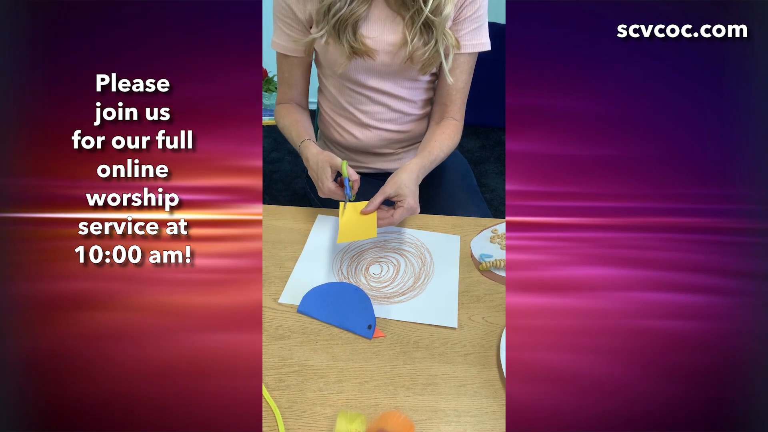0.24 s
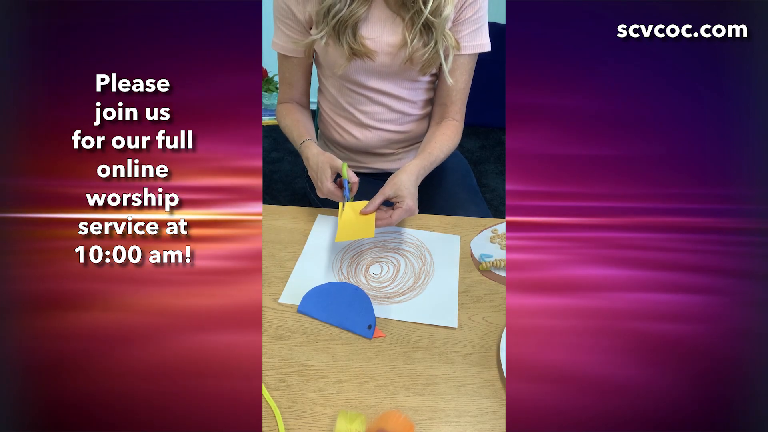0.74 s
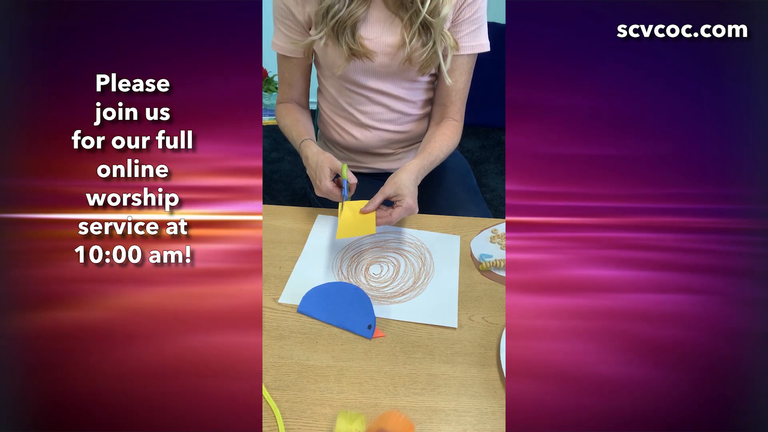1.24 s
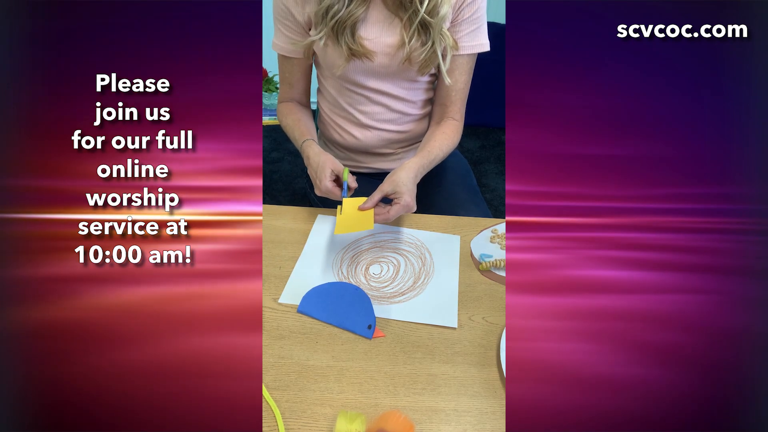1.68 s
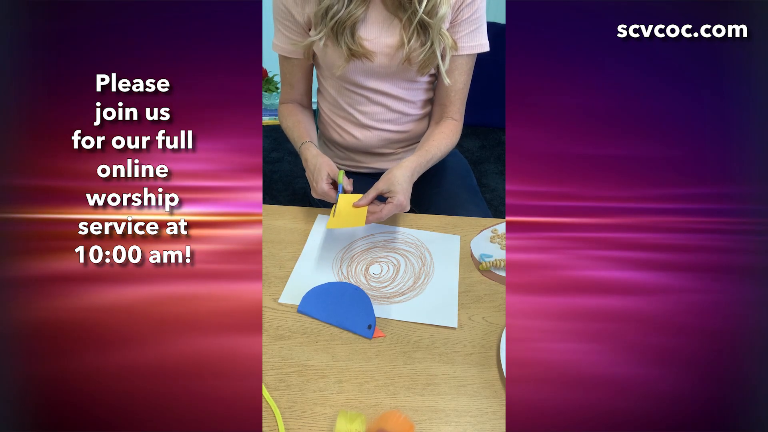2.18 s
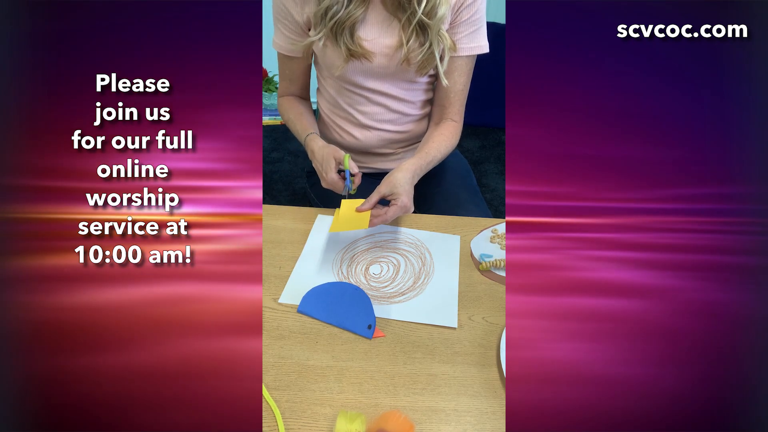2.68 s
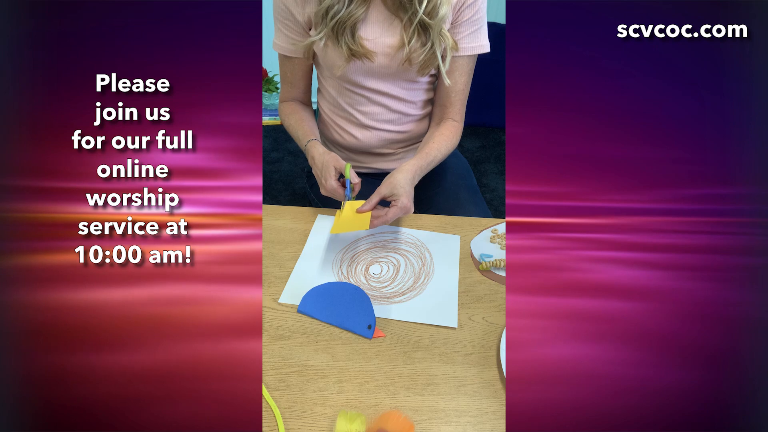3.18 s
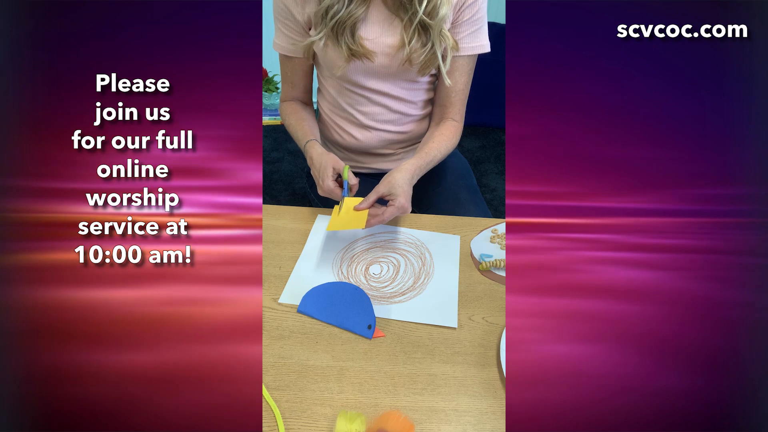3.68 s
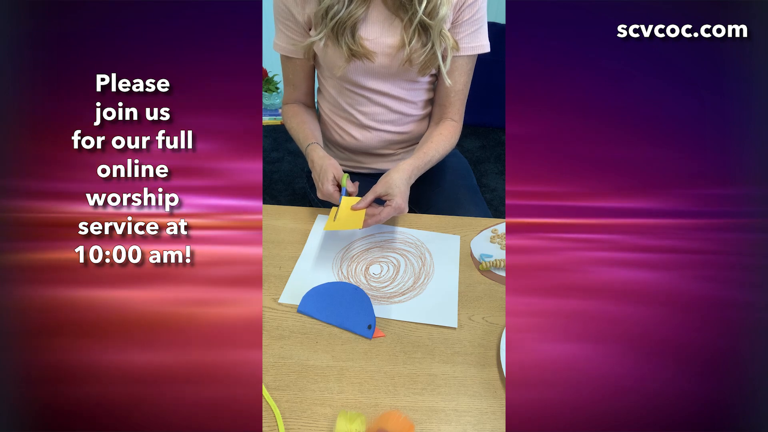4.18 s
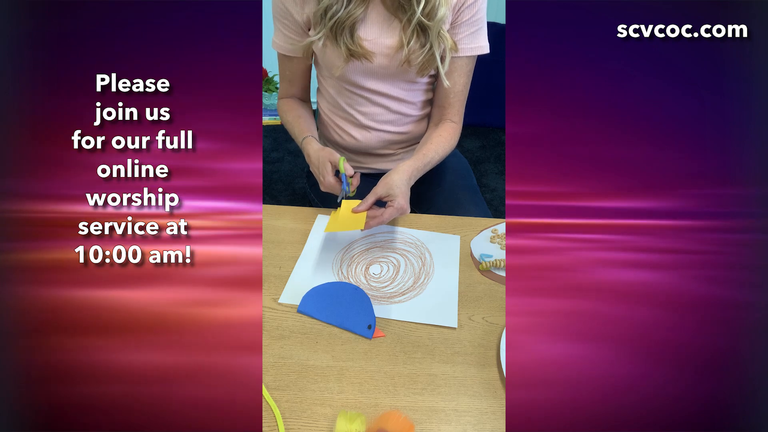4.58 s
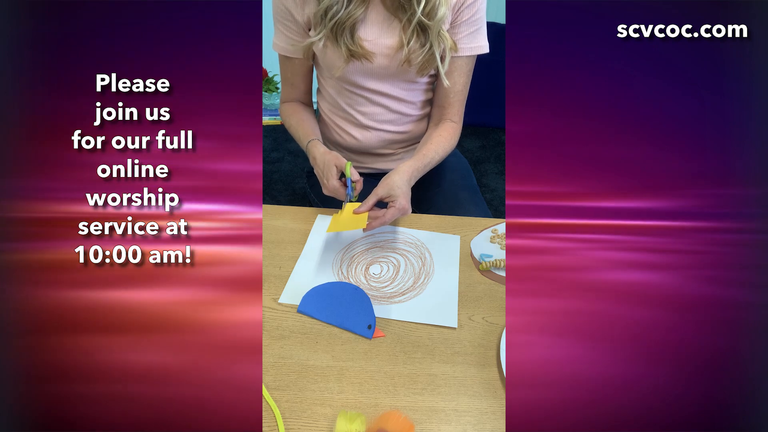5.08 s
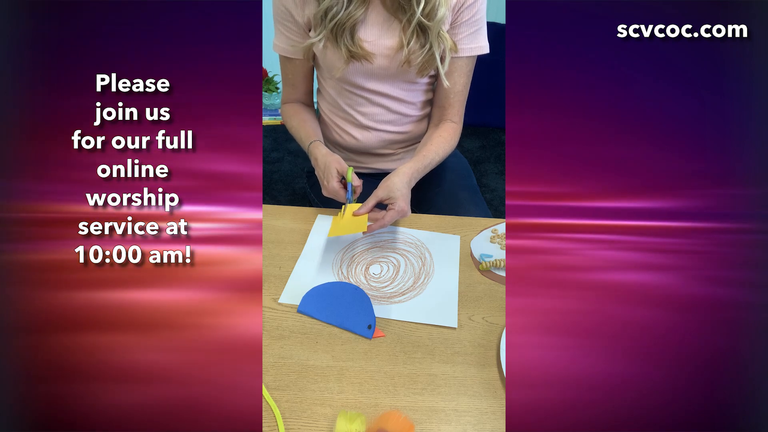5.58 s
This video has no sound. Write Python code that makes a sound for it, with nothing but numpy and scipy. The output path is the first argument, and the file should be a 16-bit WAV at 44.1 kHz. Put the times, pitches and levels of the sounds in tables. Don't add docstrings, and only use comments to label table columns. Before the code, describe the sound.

Small scissors snip crisply through stiff paper in bursts of crunchy cuts and bright metallic ticks, with short pauses in a quiet room.

```python
import sys
import numpy as np
from scipy import signal
from scipy.fft import rfft, irfft, next_fast_len
from scipy.io import wavfile
from scipy.ndimage import uniform_filter1d

SR = 44100
rng = np.random.default_rng(int(sys.argv[2]) if len(sys.argv) > 2 else 0)


def pcm_store(signal):
    levels = np.round(np.clip(np.atleast_2d(signal), -1, 1) * 32767)
    wavfile.write(sys.argv[1], SR, levels.astype(np.int16).T)


def volts_from_db(level):
    exponent = np.asarray(level, float) / 20
    return 10 ** exponent


N = 257323

# f/Hz, density/dB per Hz
SHEET_SPECTRUM = [(250, -26.5), (450, -14.5), (750, 0), (2800, -6.5), (4200, -36.5)]
# f/Hz, density/dB per Hz
BLADE_SPECTRUM = [(1500, -25), (2500, -2.5), (4800, -1.5), (5500, -24), (6500, -43.5)]
# f/Hz, density/dB per Hz
FIZZ_SPECTRUM = [(3500, -33), (5200, -6), (6200, -12.5), (8500, -8.5), (11000, -10.5), (15600, -23),
                 (16100, -70)]


def evened(x):
    return x / np.sqrt(np.mean(x ** 2) + 1e-20)


def smooth_twice(x, size, axes=(-1, -1)):
    for axis in axes:
        x = uniform_filter1d(x, size, axis)
    return x


def read_curve(points, hz):
    f, value = np.transpose(points)
    return np.interp(np.log(hz + 1), np.log(f + 1), value)


def mix_at(mix, s, sound):
    part = mix[round(s * SR):][:len(sound)]
    part += sound[:len(part)]


def colour(x, points):
    hz = abs(np.fft.fftfreq(2048, 1 / SR))
    log_gain = np.log(volts_from_db(np.maximum(read_curve(points, hz), -70)))
    taps = np.fft.ifft(np.exp(np.conj(signal.hilbert(log_gain)))).real[:1024]
    return signal.oaconvolve(x, taps / np.linalg.norm(taps))[:len(x)]


def resonate(x, hz, width_hz):
    turn = np.exp(2j * np.pi * np.cumsum(hz * np.ones(len(x))) / SR)
    r = np.exp(-np.pi * width_hz / SR)
    for _ in range(2):
        x = 2 * (turn * signal.lfilter([1 - r], [1, -r], x / turn + 1e-18)).real
    return x


def hum():
    # f/Hz, width/Hz, level/dB
    hum_lines = [(59.3, 7.3, -2.5), (119.1, 31, -5)]
    # t/s, level/dB
    hum_swell = [
        (0.0, -72),
        (5.42, -68),
        (5.83, -74),
    ]
    push = rng.standard_normal(N)
    lines = sum(volts_from_db(db) * evened(resonate(push, hz, width_hz)) for hz, width_hz, db in hum_lines)
    return lines * volts_from_db(np.interp(np.arange(N) / SR, *np.transpose(hum_swell)))


def air():
    # f/Hz, density/dB per Hz
    air_spectrum = [(28, -42.5), (50, -2.5), (80, 0), (125, -10), (300, -21), (1000, -25), (6300, -33),
                    (8600, -40.5), (9600, -40.5), (10800, -42.5), (14700, -41), (16500, -50.5)]
    # f/Hz, side-mid/dB
    air_spread = [(60, -18.5), (130, -6.5), (290, 2), (640, 9), (1400, 7.5), (7000, 1), (9600, 7.5),
                  (11500, 1.5)]
    frames, hz = N // 512 + 5, np.fft.rfftfreq(2048, 1 / SR)
    a, b, c, d, patches = rng.standard_normal((frames, 1025, 5)).T
    patches = evened(smooth_twice(patches, 8, (0, 1)))
    spread = volts_from_db(read_curve(air_spread, hz))[:, None]
    z = np.array([a + 1j * b, (c + 1j * d) * spread])
    z = z * volts_from_db(read_curve(air_spectrum, hz)[:, None] + 0.68 * patches)
    mid, side = signal.istft(z, nperseg=2048, noverlap=1536)[1][:, :N]
    level = volts_from_db(-70) / np.std(mid)
    balance = volts_from_db([[.45], [-.45]])
    return (level * np.array([mid + side, mid - side]) + hum()) * balance


def room(x):
    # f/Hz, t60/s
    decay = [(500, 0.18), (2000, 0.12), (8000, 0.04)]
    taps = np.zeros((2, SR // 2))
    slots = np.arange(180, SR // 2 - 20, 20)
    at = slots + rng.integers(0, 20, (2, len(slots)))
    np.put_along_axis(taps, at, rng.choice([-1., 1.], at.shape), 1)
    hz, t, z = signal.stft(taps, SR, nperseg=256)
    fade = volts_from_db(-60 * t / read_curve(decay, hz)[:, None])
    tail = signal.istft(z * fade, SR, nperseg=256)[1]
    tail = tail + 0.095 * tail[::-1]
    return signal.fftconvolve(x[None], tail / np.linalg.norm(tail[0]), axes=1)[:, :N]


def ports(pair):
    # f/Hz, phase/rad
    lead = [(0, 0), (600, -1.1), (1120, -.5), (2070, -.8), (2400, -1.4), (2700, .9), (4000, .1),
            (7150, -1.7), (9040, -2.9), (10900, -3.5), (13900, -5.7)]
    # f/Hz, left-right/dB
    lean = [(300, 1), (770, 0), (1500, -2.5), (2700, -2), (4200, 0)]
    size = next_fast_len(N + 4096)
    hz = np.fft.rfftfreq(size, 1 / SR)
    half = volts_from_db(read_curve(lean, hz) / 2) * np.exp(.5j * np.interp(hz, *np.transpose(lead)))
    return irfft(rfft(pair, size) * np.array([half, 1 / half]), size)[:, :N]


def fibres(count, per_s, spread_db, clump_db):
    size = volts_from_db(spread_db * np.minimum(rng.exponential(1, count), 4)) * rng.choice([-1., 1.], count)
    clumps = evened(smooth_twice(rng.standard_normal(count), 200))
    return size * (rng.random(count) < per_s / SR) * volts_from_db(clump_db * clumps)


def plate(drive, ring_ms):
    t = np.arange(1500) / SR
    modes = rng.standard_normal((3, len(t))) * np.exp(-t * 1e3 / ring_ms)
    bend = np.cos(np.pi * (np.arange(len(drive)) / SR * 9 + np.arange(3)[:, None] / 3))
    ringing = signal.oaconvolve(drive * bend, modes, axes=1).sum(0)[:len(drive)]
    return evened(drive) + evened(ringing)


def body(drive, hz, width_hz, skirt_db, edges):
    peak = resonate(drive, hz, width_hz)
    skirt = resonate(drive, hz, 3 * width_hz)
    return colour(evened(peak) + volts_from_db(skirt_db) * evened(skirt), edges)


def wander():
    bend_share, bend_s = .035, .03
    return np.exp(bend_share * evened(smooth_twice(rng.standard_normal(N), round(bend_s * SR))))


def effort_db(pushes):
    range_db = 25
    rounding = 1.53
    t = np.arange(0, N + 64, 64) / SR
    peak_s, rise_s, fall_s, sheet_db, over_db = np.transpose(pushes)[:, :, None]
    away = np.maximum((peak_s - t) / rise_s, (t - peak_s) / fall_s)
    sheet = volts_from_db(sheet_db - range_db * away ** rounding) ** 2
    blade = sheet * volts_from_db(over_db) ** 2
    return [np.interp(np.arange(N) / SR, t, 10 * np.log10(p.sum(0) + 1e-20)) for p in (sheet, blade)]


def tearing(pushes, sheet_hz, blade_hz, fizz_db, clump_db, skirt_db):
    sheet_db, blade_db = effort_db(pushes)
    drive = fibres(N, per_s=5000, spread_db=3.0, clump_db=clump_db)
    sheet = body(plate(drive, ring_ms=6.0), sheet_hz * wander(), 470, skirt_db, SHEET_SPECTRUM)
    blade = body(plate(drive, ring_ms=5.0), blade_hz * wander(), 1000, skirt_db, BLADE_SPECTRUM)
    fizz = volts_from_db(fizz_db) * evened(colour(drive, FIZZ_SPECTRUM))
    return volts_from_db(sheet_db) * evened(sheet) + volts_from_db(blade_db) * (evened(blade) + fizz)


def strokes():
    # peak t/s, rise/s, fall/s, sheet level/dB, blade over sheet/dB
    cuts = [(1.385, 0.022, 0.045, -45, -6.5), (1.465, 0.035, 0.17, -45, -10.5),
            (1.575, 0.12, 0.062, -41.5, -9.5), (2.161, 0.069, 0.21, -49, -16),
            (2.992, 0.09, 0.083, -53, -10), (3.349, 0.093, .12, -47.5, -2),
            (3.468, 0.12, 0.066, -45.5, -1.5), (4.484, 0.02, 0.048, -47.5, 1),
            (5.28, 0.03, 0.046, -66.5, -12), (5.68, 0.12, 0.14, -65, 9), (5.76, 0.2, 0.28, -61, -1.5)]
    # peak t/s, rise/s, fall/s, sheet level/dB, blade over sheet/dB
    tips = [(2.299, 0.092, 0.16, -52, -7.5), (2.43, .008, 0.1, -62.5, -3), (2.516, 0.02, 0.039, -35, -1.5),
            (2.545, 0.058, 0.094, -51, -0.5), (3.54, 0.054, 0.071, -64, 4), (3.646, 0.01, 0.083, -52, -4.5),
            (4.12, 0.032, 0.064, -43, -13), (4.17, 0.069, 0.065, -48.5, -12.5),
            (4.239, 0.059, 0.058, -55.5, -17), (4.335, 0.0087, 0.068, -46, -12),
            (4.461, 0.047, 0.06, -57.5, -16), (4.55, 0.096, 0.048, -52.5, 1.5)]
    # peak t/s, rise/s, fall/s, sheet level/dB, blade over sheet/dB
    shears = [
        (1.768, 0.0054, 0.081, -36.5, -10),
        (1.86, 0.11, 0.068, -45.5, -6.5),
        (1.93, 0.13, 0.12, -45.5, 0),
        (1.999, 0.14, 0.049, -41, -8),
        (.89, 0.073, 0.077, -57, -10.5),
        (1.31, 0.036, 0.096, -70.5, 8.5),
        (1.449, .008, 0.041, -63.5, 9),
        (5.101, 0.013, 0.2, -72, 12.5),
        (5.61, 0.047, .12, -67, -0.5),
        (5.82, 0.28, 0.11, -66, 6),
    ]
    # peak t/s, rise/s, fall/s, sheet level/dB, blade over sheet/dB
    slides = [
        (2.079, .012, 0.17, -50, 3),
        (2.867, 0.0064, 0.27, -63, 11.5),
        (3.02, 0.12, 0.024, -47, -3),
        (3.289, 0.025, .06, -64, 6.5),
        (1.33, 0.044, 0.082, -64, 6.5),
        (3.702, 0.053, 0.2, -51, 1.5),
        (3.8, 0.046, 0.17, -47, 2),
        (3.93, 0.35, 0.11, -53.5, -4.5),
        (4.019, 0.0054, 0.089, -52, -1),
    ]
    # peak t/s, rise/s, fall/s, sheet level/dB, blade over sheet/dB
    rustles = [(0.273, 0.015, 0.11, -81.5, 17.5), (.335, 0.046, 0.057, -66.5, 7),
               (0.411, 0.04, 0.051, -62.5, 3.5), (.47, 0.031, .05, -73, -12), (.66, .05, 0.031, -80, 0.5),
               (.82, 0.014, 0.24, -69, 5), (1.011, 0.054, 0.025, -55, -6.5), (1.12, 0.066, 0.082, -76.5, 6),
               (5.161, 0.071, .06, -59.5, 4.5), (5.26, 0.055, 0.1, -77, 5.5),
               (5.361, 0.038, 0.02, -51.5, -5)]
    # sheet f/Hz, blade f/Hz, fizz over blade/dB, clumping/dB, skirt over peak/dB
    loads = [
        (900, 3420, 0, 4.5, 2.5),
        (1332, 3380, -0.5, 3.5, 19),
        (2130, 4300, -6.5, 1.4, 8.5),
        (1650, 3460, -4.5, 2.5, 22),
        (1620, 3470, -11, 4, 15),
    ]
    kinds = (cuts, tips, shears, slides, rustles)
    return sum(tearing(pushes, *load) for pushes, load in zip(kinds, loads))


def snap(s, blade_db, blade_hz, sheet_db, sheet_hz, swell_ms):
    grit = rng.standard_normal(1600)
    u = np.arange(len(grit)) / SR * 1e3 / max(1.2 * swell_ms, .4)
    burst = grit * (u * np.exp(1 - u)) ** 1.53
    sheet = body(burst, sheet_hz, 520, 6.5, SHEET_SPECTRUM)
    blade = body(burst, blade_hz, 920, 4.5, BLADE_SPECTRUM)
    fizz = colour(burst, FIZZ_SPECTRUM)
    sheet, blade, fizz = (v / abs(v).max() for v in (sheet, blade, fizz))
    return s, volts_from_db(sheet_db + 4) * sheet + volts_from_db(blade_db + 1.5) * (blade + volts_from_db(-3.5) * fizz)


def snaps():
    # t/s, level/dB, sheet f/Hz, swell/ms
    buckles = [(.4456, -42.5, 1290, 0.71), (1.4271, -43.5, 795, 0.75), (1.5012, -34.5, 1160, 2.4),
               (1.5117, -45, 940, 1.4), (1.7645, -47, 2160, 1.2), (2.1641, -56, 1344, 0.4),
               (2.229, -29, 1190, 1.3), (2.9978, -35.5, 1130, 2.2), (3.0385, -43.5, 1850, 1.1),
               (3.3368, -41.5, 1010, 2.2), (3.355, -40.5, 1120, 9.7), (3.4017, -43, 1100, 2.8),
               (3.4284, -36.5, 1700, 3.9), (3.4464, -37.5, 1040, 0.37), (4.1227, -50, 1720, 3.4),
               (4.3341, -44, 1447, 0.3), (4.5198, -44, 1860, 2.3)]
    # t/s, level/dB, blade f/Hz, swell/ms
    slips = [(1.163, -60, 2850, 3.8), (1.5759, -28, 3154, 1.3), (1.6233, -39.5, 3100, 1.8),
             (2.0662, -35, 4000, 1.3), (2.0728, -20, 3500, 1.1), (2.0775, -25, 3440, 1.4),
             (2.1264, -32.5, 3395, 2.7), (3.229, -59, 3900, 1.2), (3.6455, -36, 4690, 1.44),
             (3.7248, -26.5, 5050, 2.3), (4.0143, -42.5, 2950, 4.1), (4.048, -43, 4500, 2),
             (5.7044, -40.5, 3930, 3.1), (5.734, -40.5, 4750, 3.9), (5.764, -39, 4540, 1.1),
             (5.7825, -33, 4260, 1.4), (5.819, -39, 4470, 2)]
    # t/s, level/dB, blade f/Hz, sheet f/Hz, swell/ms
    bites = [(0.4546, -47, 4430, 1560, 0.94), (0.5501, -50.5, 4800, 1240, 0.98),
             (1.0115, -51.5, 2400, 1600, 5.1), (1.4799, -35.5, 4080, 950, 5.1),
             (1.5304, -29.5, 3760, 1260, 2.9), (1.5502, -30, 2500, 1240, 2.6),
             (2.1467, -37.5, 3140, 1220, 2.3), (2.1821, -42.5, 4370, 995, 2.2), (2.216, -37, 4500, 1040, 3),
             (2.2719, -30.5, 2340, 1450, 1.7), (2.3015, -24.5, 4500, 1285, 2.37),
             (2.4232, -31.5, 4300, 1460, 0.77), (2.5063, -28.5, 3840, 1393, 1.31),
             (3.3844, -34, 3650, 1230, 1.94), (3.4557, -26, 3540, 1100, 3.5),
             (3.5005, -28, 3850, 1187, 2.76), (3.787, -34.5, 4740, 1580, 2), (3.7966, -36, 2730, 1190, 4.3),
             (4.1023, -35, 4530, 1480, 2.2), (4.13, -39, 2500, 1610, 2.2), (4.1558, -33, 2400, 1100, 2.3),
             (4.2287, -42, 2440, 1540, 1.5), (4.3238, -29.5, 4470, 1190, 1.12), (4.48, -27, 4500, 880, .35)]
    # t/s, level/dB, swell/ms
    ticks = [(.4621, -54.5, 4.3), (1.456, -65, 0.32), (2.2, -62, 1.1), (3.028, -49, 1.9),
             (4.0746, -42.5, 0.81), (4.173, -42.5, 2), (5.6717, -50.5, 8.4), (0.29, -65, 1.4),
             (3.7205, -35.5, 1.7), (4.061, -52, 1), (4.212, -48, 0.81), (4.6, -62, 1.4), (4.5, -41, 0.48),
             (4.2, -50, 1.5), (1.445, -45.5, 1.6), (3.765, -44, 1), (0.72, -74.5, 1.4), (4.141, -54, 1.3),
             (1.918, -46, 1.7), (1.636, -41, 0.48), (1, -72, 1.1)]
    usual_blade_hz, usual_sheet_hz = 3840, 1470
    buckle_blade_db, slip_sheet_db, bite_blade_db = -12.5, -15.5, -1
    return ([(s, db + buckle_blade_db, usual_blade_hz, db, hz, ms) for s, db, hz, ms in buckles]
            + [(s, db, hz, db + slip_sheet_db, usual_sheet_hz, ms) for s, db, hz, ms in slips]
            + [(s, db + bite_blade_db, blade_hz, db, hz, ms) for s, db, blade_hz, hz, ms in bites]
            + [(s, db, usual_blade_hz, db, usual_sheet_hz, ms) for s, db, ms in ticks])


def steel_ring(hits):
    # f/Hz, level/dB, t60/s
    steel = [(2755, -25, 0.2), (2890, -21, 0.16), (3020, -22.5, 0.11)]
    # from t/s, to t/s
    loose_grip = (1.54, 2.49)
    damped_db = -14
    t, now = np.arange(SR // 4) / SR, np.arange(N) / SR
    ring = sum(volts_from_db(db - 60 * t / t60) * np.sin(2 * np.pi * hz * t) for hz, db, t60 in steel)
    free = np.where((now > loose_grip[0]) & (now < loose_grip[1]), 1, volts_from_db(damped_db))
    return 0.076 * signal.oaconvolve(hits * free, ring)[:N]


def scissors():
    rub = strokes()
    hits = np.zeros(N)
    for row in snaps():
        mix_at(hits, *snap(*row))
    return rub + hits + steel_ring(hits)


def scene():
    near = scissors()
    return ports(near + volts_from_db(-11) * room(near)) + air()


def starve(pair):
    # f/Hz, level/dB
    starved = [
        [(8300, -130), (8900, -106), (10400, -106), (10800, -122), (12100, -121), (12300, -114.5)],
        [(11900, -130), (12100, -106), (14500, -98)],
    ]
    mood_db = 3
    hz, t, z = signal.stft(np.array([pair[0] + pair[1], pair[0] - pair[1]]) / 2, SR, nperseg=1024)
    power = uniform_filter1d(uniform_filter1d(abs(z) ** 2, size=16, axis=1), size=3, axis=2)
    band_db = 10 * np.log10(power + 1e-20)
    loud_db = np.maximum(band_db[0, 30:120].mean(0) + 92, 0)
    limit_db = np.array([np.interp(hz, *np.transpose(curve)) for curve in starved])[:, :, None]
    moods = np.kron(rng.standard_normal((len(t) // 3 + 1, 33)).T, np.ones((16, 3)))
    moods = moods[:len(hz), :len(t)]
    strong = band_db + mood_db * moods > limit_db + .5 * loud_db
    f = hz[:, None]
    kept = strong & (f < 16200) | (f < 8300)
    mid, side = signal.istft(z * kept, SR, nperseg=1024)[1][:, :N]
    return np.array([mid + side, mid - side])


def top_cut(x):
    return signal.sosfilt(signal.butter(12, 16800, fs=SR, output="sos"), x)


def record(dry):
    mix = starve(dry)
    return top_cut(mix)


dry = scene()
out = record(dry)
pcm_store(out)
```